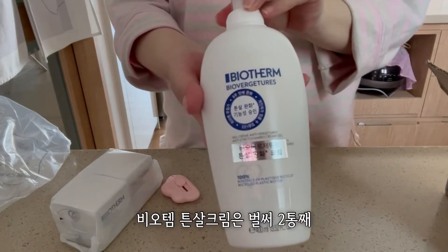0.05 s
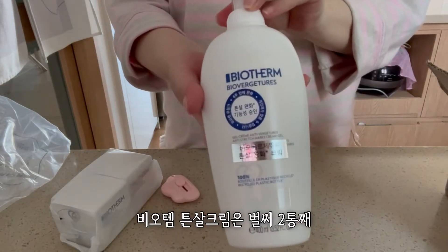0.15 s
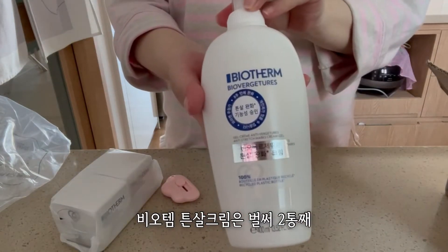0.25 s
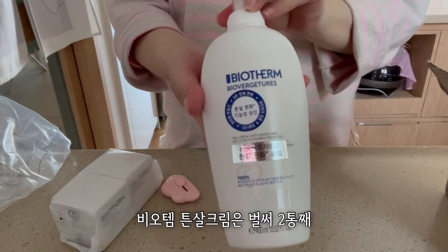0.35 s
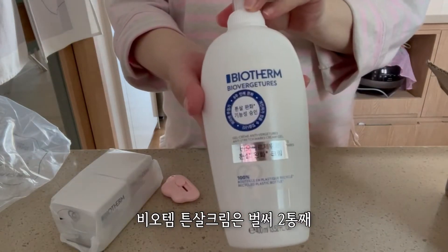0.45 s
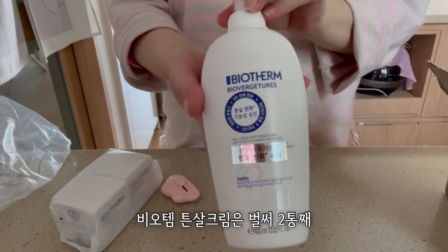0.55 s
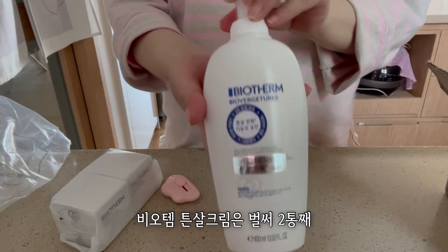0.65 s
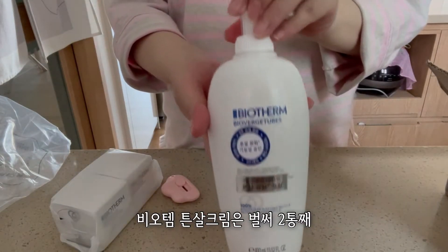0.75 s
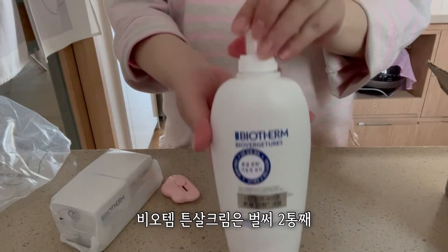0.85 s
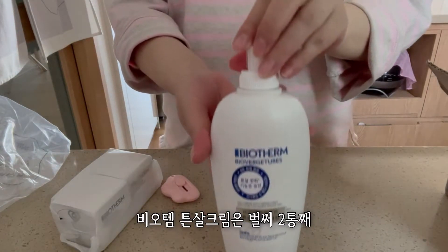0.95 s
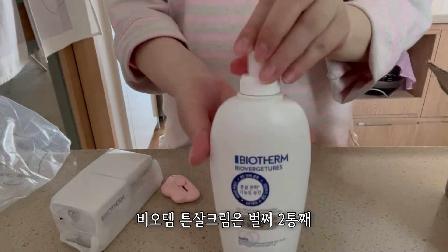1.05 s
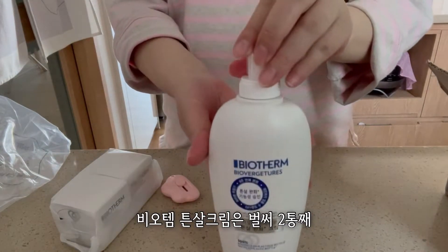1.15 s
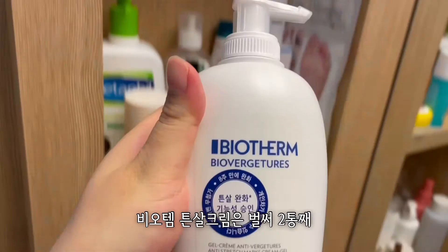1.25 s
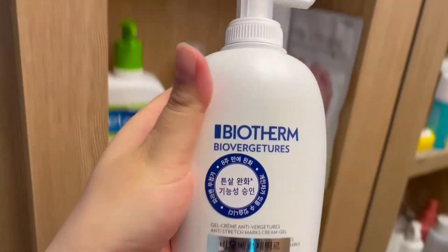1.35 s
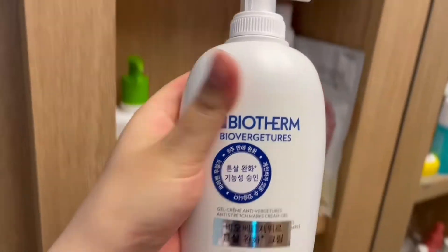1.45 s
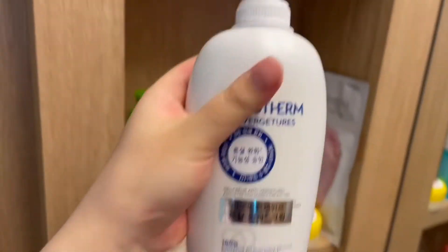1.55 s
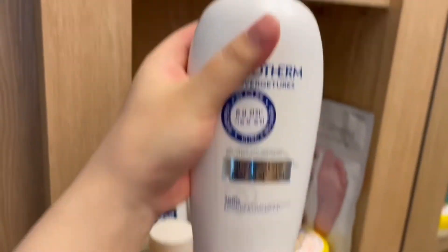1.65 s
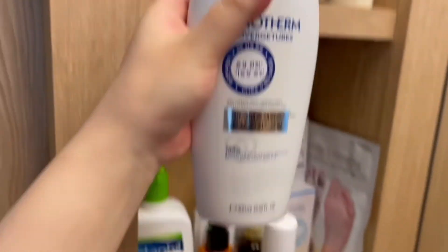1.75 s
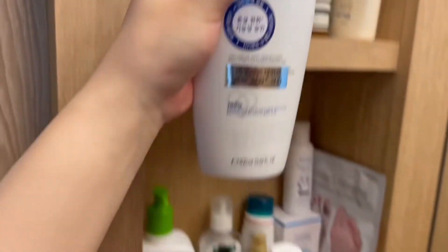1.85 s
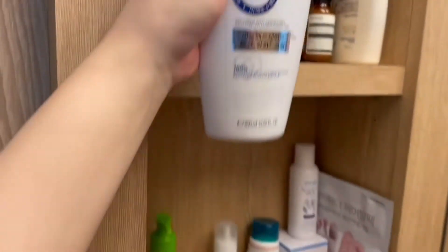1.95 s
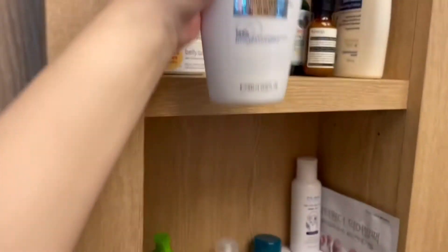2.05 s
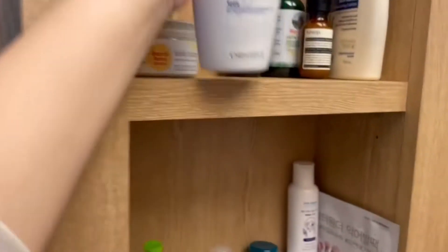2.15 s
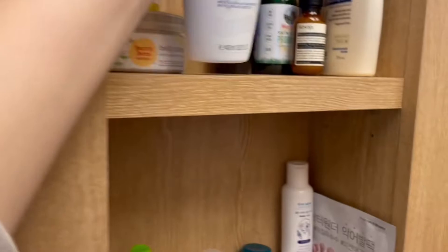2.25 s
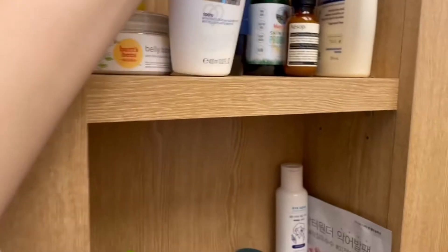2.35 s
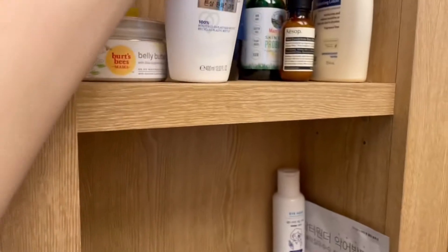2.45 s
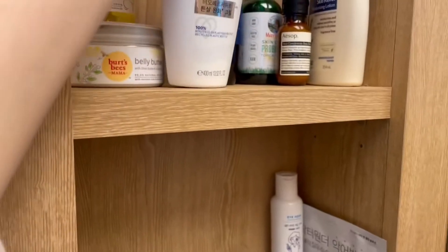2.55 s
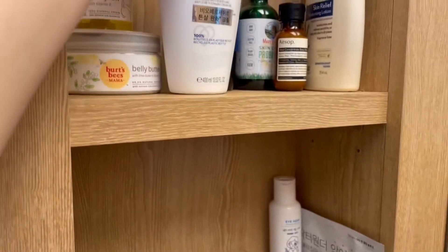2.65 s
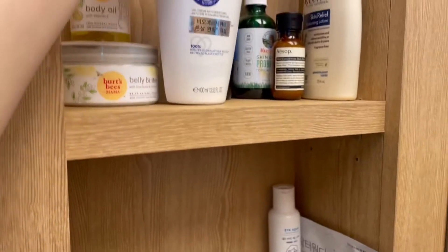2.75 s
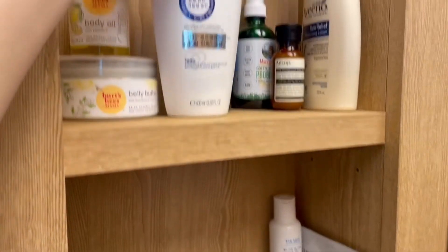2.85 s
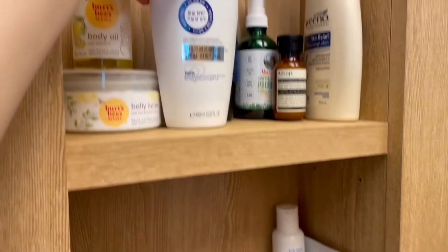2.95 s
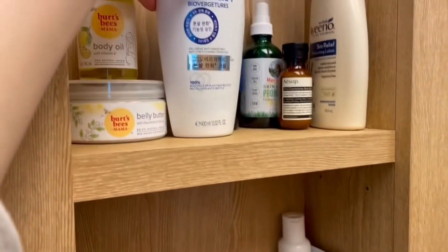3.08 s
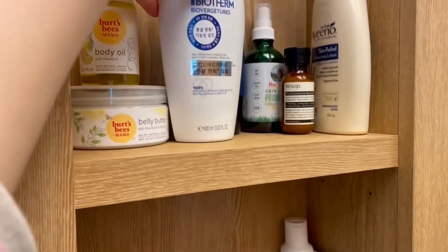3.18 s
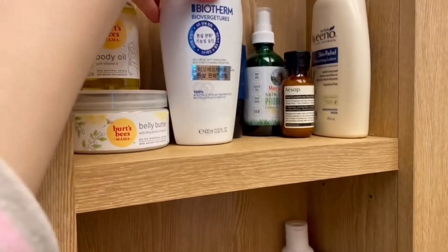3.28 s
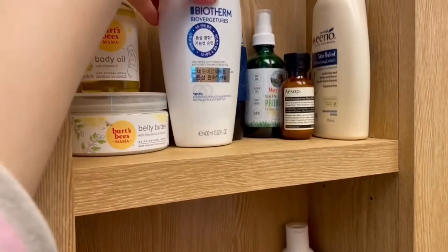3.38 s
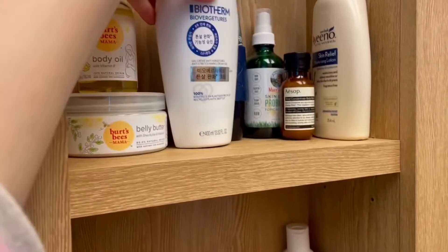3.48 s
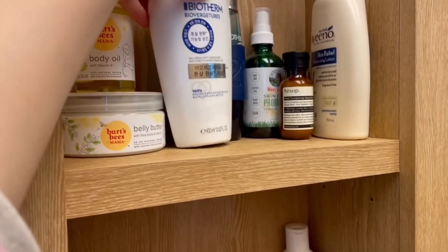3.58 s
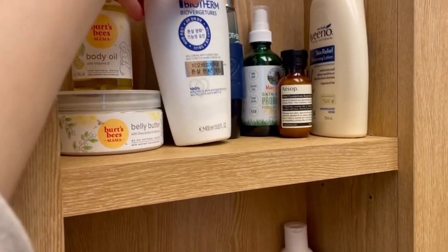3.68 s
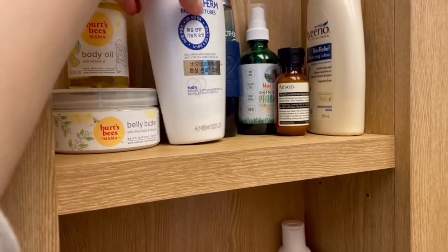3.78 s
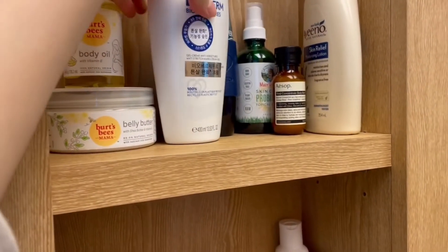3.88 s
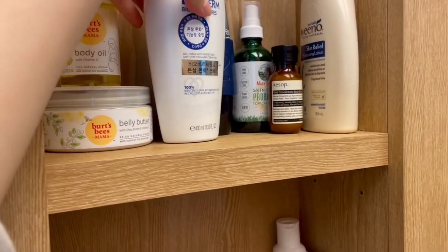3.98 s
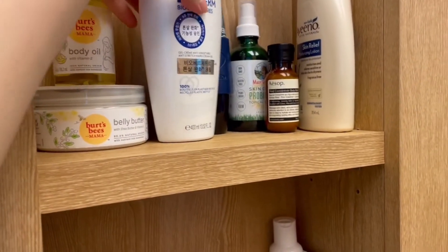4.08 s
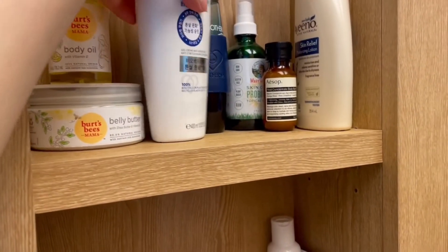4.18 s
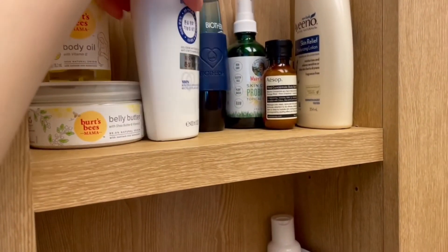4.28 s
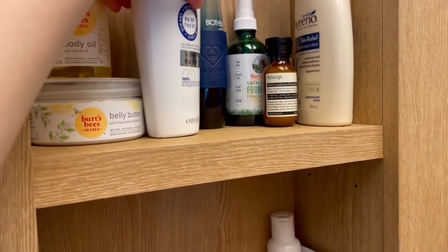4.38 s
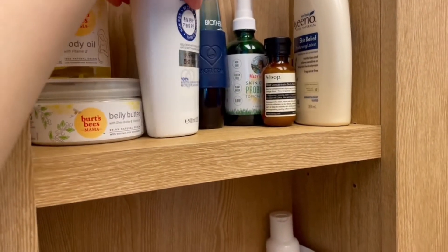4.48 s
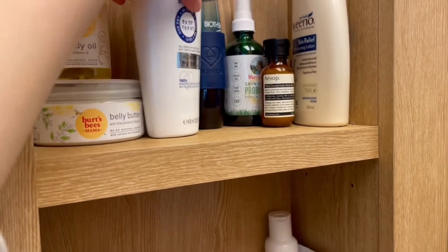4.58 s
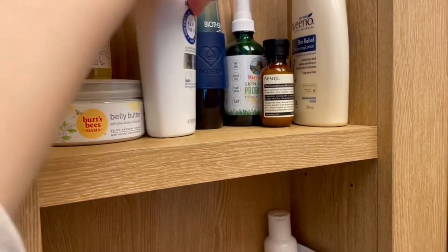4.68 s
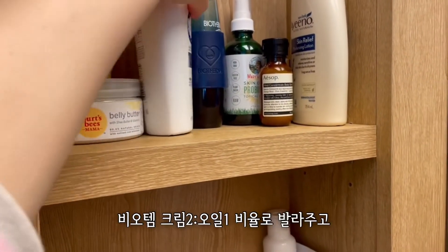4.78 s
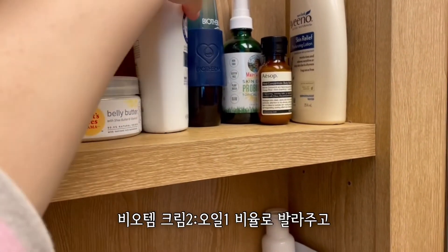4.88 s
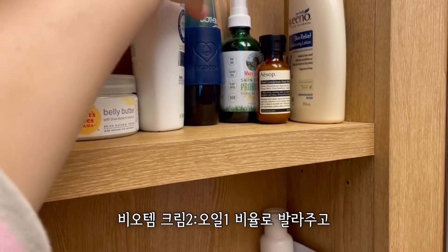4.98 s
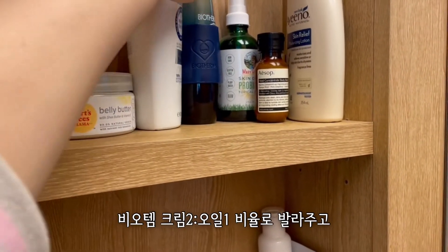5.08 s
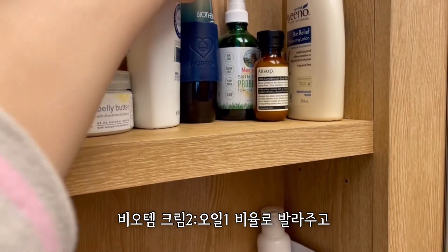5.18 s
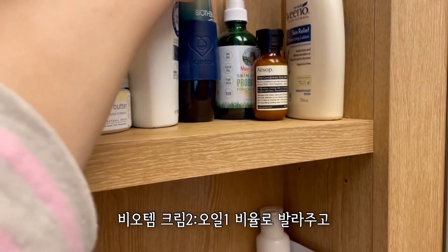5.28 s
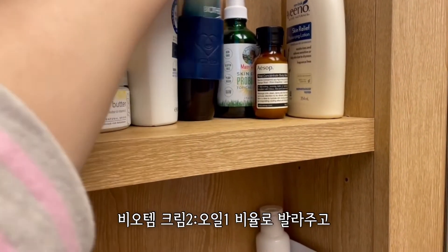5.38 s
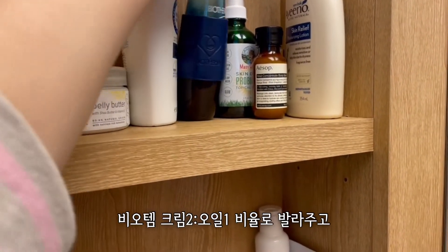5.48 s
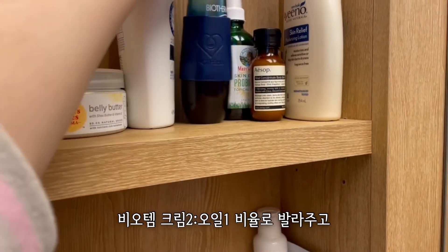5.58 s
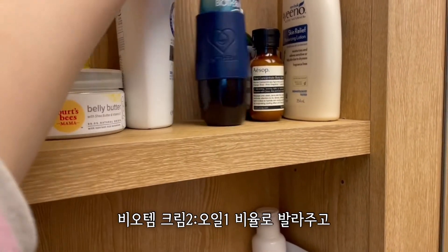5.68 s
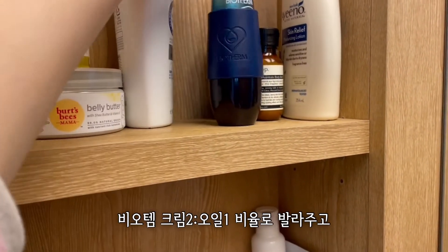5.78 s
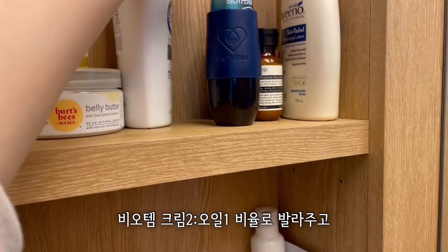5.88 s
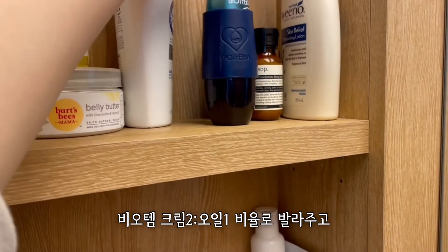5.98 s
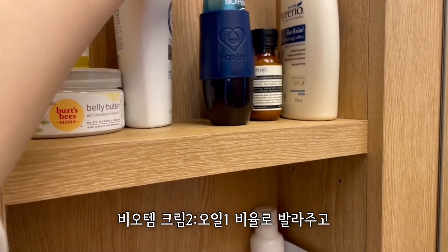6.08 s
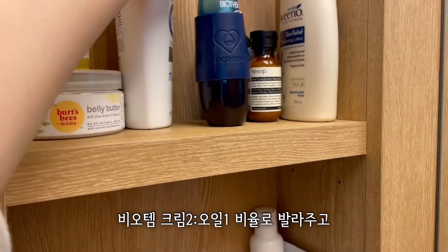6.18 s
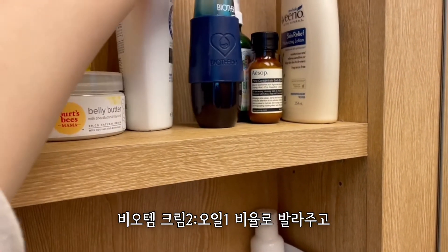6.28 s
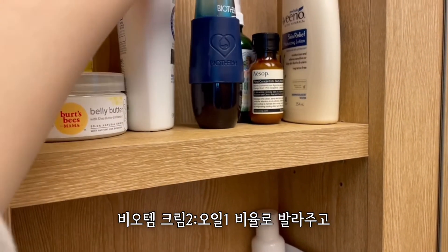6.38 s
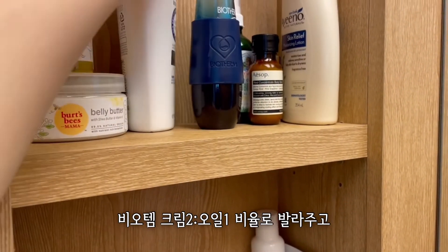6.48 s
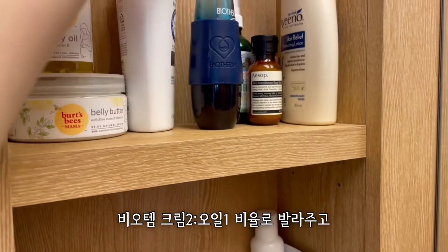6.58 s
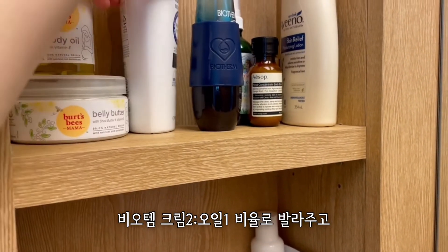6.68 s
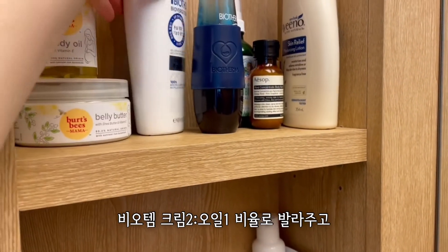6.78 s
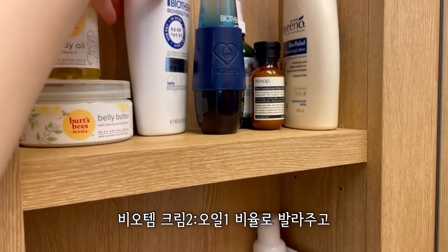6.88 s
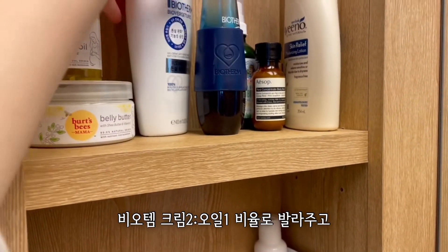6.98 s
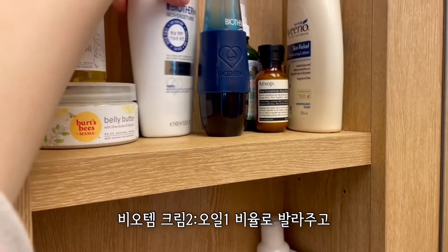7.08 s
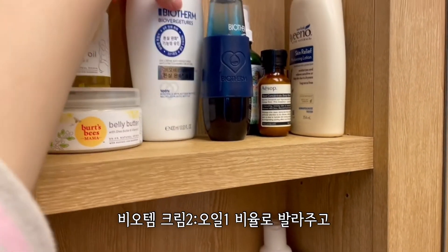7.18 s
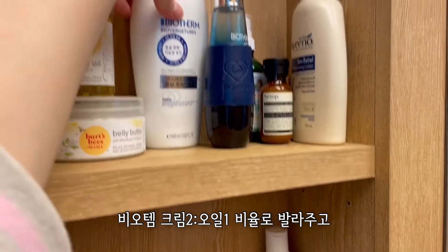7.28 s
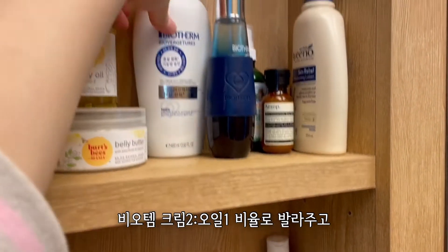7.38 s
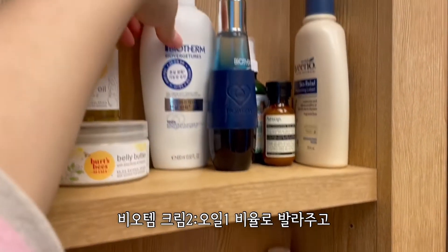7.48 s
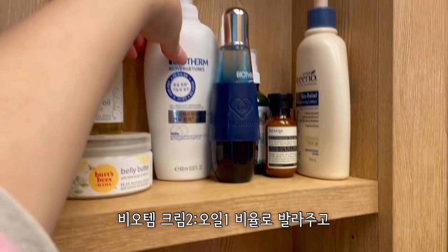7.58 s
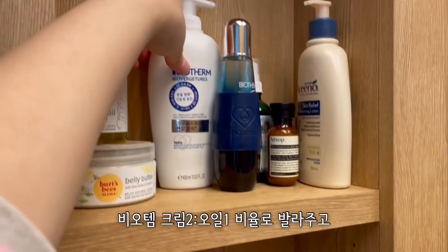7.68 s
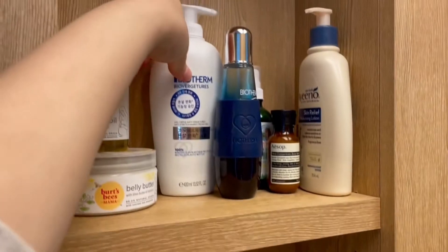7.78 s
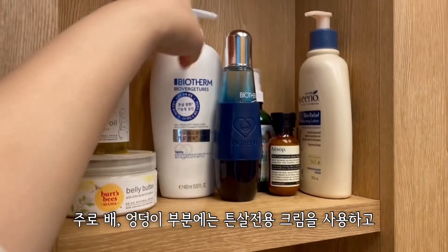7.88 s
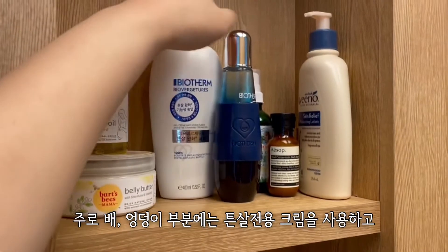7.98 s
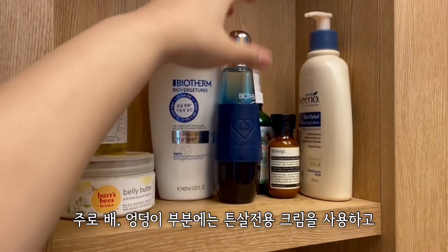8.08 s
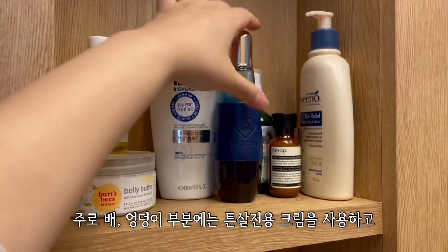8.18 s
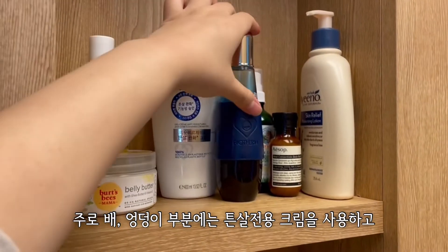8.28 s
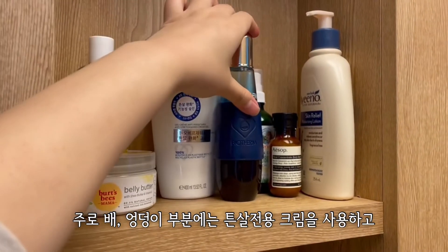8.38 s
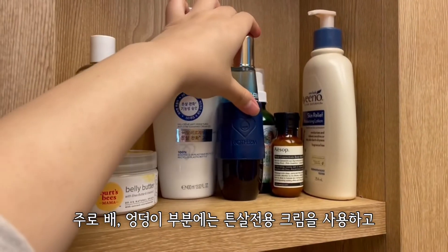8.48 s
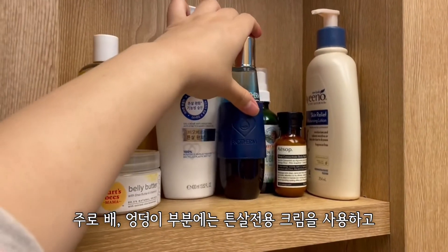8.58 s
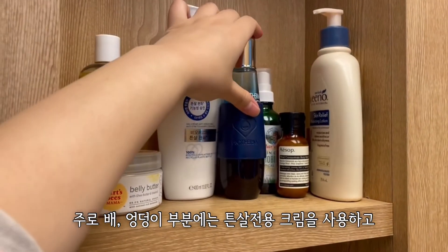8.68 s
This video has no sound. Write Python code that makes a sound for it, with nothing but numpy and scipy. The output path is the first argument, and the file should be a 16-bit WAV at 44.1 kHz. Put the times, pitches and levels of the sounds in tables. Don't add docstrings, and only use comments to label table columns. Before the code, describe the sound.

In a quiet humming kitchen, a full plastic bottle lands on a stone counter with a low thud and small crack. The place abruptly switches to a drier, quieter wooden closet, where bottles are set down, knocked and rocked on a shelf. A glass flask scrapes forward briefly, then another firm knock and light touches follow. Sleeve cloth rustles finely. Close stereo handheld microphone with faint low handling rumble.

```python
import sys
import numpy as np
from scipy import signal
from scipy.fft import rfft, irfft
from scipy.io import wavfile

SR = 44100
rng = np.random.default_rng(int(sys.argv[2]) if len(sys.argv) > 2 else 0)


def transcribe(signal):
    frames = np.atleast_2d(signal).T
    limited = np.clip(frames, -1, 1)
    pcm = np.round(limited * 32767).astype(np.int16)
    wavfile.write(sys.argv[1], SR, pcm)


def convert_level_to_amplitude(level_db):
    exponent = np.asarray(level_db, float) / 20
    return 10 ** exponent


N = 385434
CUT_S = 1.246
HZ = np.maximum(np.fft.rfftfreq(N, 1 / SR), 1)

# pitch_hz, level_db
BOARD = [
    [(155, 2.5), (190, 2.5), (230, 4.5), (290, -0.5), (350, -2.5), (445, -5)],
    [(560, -2), (630, 1), (705, 0.5), (765, 12), (850, 8), (945, 6), (1050, 3.5), (1200, -21.5)],
]
# pitch_hz, level_db_per_hz
BOTTLE = [(1000, -16), (1400, -6), (1800, 4.5), (2300, -1.5), (2700, 3), (3330, 2.5), (4000, -6.5),
          (5000, -1.5), (6500, -6), (8000, -23), (10000, -21)]
# pitch_hz, level_db
NEIGHBOUR = [(1550, -11), (1720, -3), (1900, -4), (2190, -9), (2400, -2.5), (2750, -1), (3050, -6.5),
             (3350, -4.5), (3700, -10.5), (4030, -18), (4900, -17)]
# pitch_hz, level_db_per_hz
RUSTLE = [(3000, -36), (6000, -16), (8500, -1), (13000, -2), (15000, -6), (16000, -16), (17000, -35)]
# pitch_hz, likeness
LIKENESS = [(60, 0.58), (180, 0.84), (550, 0.46), (1650, 0.36), (4970, 0.67), (15000, 0.88)]


def counter_blows():
    # start_s, strength_db, low_weight_db, crack_db, ring_t60_s
    landings = [
        (0.949, -44.5, 15.5, 0, 0.045),
        (0.975, -50, 16.5, -22, 0.069),
        (1.157, -63.5, 9, 3, 0.019),
    ]
    # pitch_hz, level_db
    slab = [
        [(145, 14), (253, 7.5), (340, 0.5), (440, -21)],
        [(533, -10), (620, 23), (930, 2.5), (1200, -6)],
    ]
    # pitch_hz, level_db_per_hz
    crack = [(1000, -5), (1480, 16), (1900, -16), (2600, -1), (3600, -8), (5800, -4), (7500, -1),
             (9500, -20)]
    return blows(landings, slab, crack, edge_db=-30)


def shelf_blows():
    # start_s, strength_db, low_weight_db, crack_db, ring_t60_s
    rims = [(2.313, -27, 0.5, -17.5, 0.036), (2.825, -52, 1, -32, 0.068), (3.224, -47, 2, -29, 0.1),
            (3.291, -38, -6, -24, 0.014), (3.479, -78, -5, -16, 0.061), (3.523, -67.5, 12.5, -25, 0.2),
            (3.616, -57, -5, -19, 0.086), (4.088, -66.5, 13.5, -20, 0.088), (4.907, -51, -23, -13, 0.017),
            (5.166, -35.5, 7.5, -5, 0.086), (6.077, -72, 8, -31, 0.069), (6.608, -56.5, 0, 8.5, 0.025),
            (7.353, -27.5, 6, -15, 0.016), (8.487, -51.5, 0.5, -19.5, 0.31), (8.563, -49.5, 9, -28, 0.053)]
    # start_s, strength_db, low_weight_db, crack_db, ring_t60_s
    flats = [
        (2.364, -43.5, 8, -13, 0.049),
        (2.92, -57.5, -4, -3, 0.028),
        (3.803, -40.5, -1.5, -22.5, 0.036),
        (4.228, -56.5, 7, -2.5, 0.081),
        (6.155, -51, 0, -39, 0.13),
        (7.062, -57, 3.5, -14, 0.12),
        (7.147, -52, -3, -29, 0.084),
        (8.3, -53.5, 5, -17, 0.15),
    ]
    # start_s, strength_db, low_weight_db, crack_db, ring_t60_s
    rocks = [
        (2.385, -51, 9, -11, 0.039),
        (3.278, -51, 9.5, -19, 0.064),
        (6.405, -80, 11, -5, 0.024),
        (6.735, -69, 2, 1, 0.052),
        (3.47, -67, -1, -6.5, 0.046),
        (7.086, -53.5, -15, -15.5, 0.087),
        (7.168, -59, 8, -19, 0.13),
        (8.473, -58, -3, -12, 0.026),
        (8.6, -61, -2, -22, 0.056),
    ]
    return sum(blows(table, BOARD, BOTTLE, edge_db) for table, edge_db in ((rims, -4.5), (flats, -36), (rocks, -36)))


def blows(table, body, shell, edge_db):
    out, t = np.zeros(N), np.arange(16384) / SR
    for s, strength_db, weight_db, hard_db, t60 in table:
        levels_db = strength_db + np.array([weight_db, 0, hard_db, hard_db + edge_db])
        t60 = np.clip(t60, .02, .6)
        noise = rng.standard_normal((4, len(t)))
        low_push = soft(noise[0], hz=645) * t * np.exp(-t / 0.0035) + 1e-18
        upper_push = soft(noise[1], hz=1420) * np.exp(-t / 0.0075) + 1e-18
        parts = [ring(low_push, body[0], t60, spread_db=3.5),
                 ring(upper_push, body[1], 0.87 * t60, spread_db=-5.5),
                 shaped(noise[2], shell) * (np.exp(-t / 0.011) + 3.2 * convert_level_to_amplitude(-60 * t / t60)),
                 shaped(noise[3], RUSTLE) * (np.exp(-t / 0.0046) + 0.36 * np.exp(-t / 0.017))]
        for db, part in zip(levels_db, parts):
            add(out, s, convert_level_to_amplitude(db + 9.5) * part / np.abs(part).max())
    return out


def furniture_swing():
    # start_s, peak_db, pitch_hz, swell_s, t60_s
    swings = [(0.956, -9, 76.4, 0.011, 0.098), (1.172, -32.5, 72.7, 0.031, 0.092),
              (2.333, -28, 63.6, 0.011, 0.55), (2.399, -27, 60.8, 0.0045, 0.15),
              (2.929, -35, 70.5, 0.0083, 0.034), (3.237, -19, 66.3, 0.01, 0.33),
              (3.329, -26, 58, 0.029, 0.16), (3.808, -40.5, 66.3, 0.043, 0.74), (4.24, -48, 74, 0.027, 0.3),
              (4.937, -35, 56.5, 0.0081, 0.15), (5.173, -25, 70.8, 0.0065, 0.26),
              (7.16, -35, 51, 0.0031, 0.1), (7.36, -11, 70, 0.039, 0.064),
              (7.353, -17, 142.4, 0.0025, 0.16), (7.437, -23, 67.6, 0.0068, 0.2),
              (8.333, -34.5, 65.3, 0.011, 0.34), (8.564, -29.5, 79, 0.02, 0.14),
              (8.65, -34.5, 73.5, 0.012, 0.14)]
    swing = thumps(swings, sag_s=.005)
    later = np.roll(swing, round(0.0029 * SR)) * (np.arange(N) / SR < CUT_S)
    return swing + convert_level_to_amplitude(-13) * later * [[1], [-1]]


def panel_notes():
    # start_s, peak_db, pitch_hz, swell_s, t60_s
    heavy = [(0.9531, -40, 291, 0.0037, .14), (2.3141, -28.5, 294, 0.0028, 0.058),
             (2.3142, -27.5, 162, 0.0045, .075), (2.3161, -37, 1027, 0.0033, 0.12),
             (2.3351, -31.5, 112, .0081, 0.14), (2.3621, -37, 166, 0.0042, .075),
             (2.3671, -42, 1010, .0031, 0.17), (2.4031, -34.5, 117, 0.0071, 0.1),
             (3.2221, -48.5, 720, .0031, 0.086), (3.2321, -35.5, 197, 0.004, 0.064),
             (3.2331, -37.5, 308, 0.0055, 0.1), (3.2931, -32.5, 334, 0.0025, 0.068),
             (3.2941, -37, 444, 0.0037, .13), (3.3521, -60.5, 440, 0.0086, 0.069),
             (3.8051, -37, 191, 0.0051, .12), (3.8052, -46.5, 294, 0.0084, 0.12),
             (3.8053, -41.5, 630, .0031, 0.083), (3.8054, -58.5, 2750, .002, 0.097),
             (5.1671, -26, 170, 0.0033, 0.074), (5.1691, -28.5, 452, 0.0028, 0.1),
             (5.1692, -32.5, 714, 0.0026, 0.15), (5.1672, -50.5, 2317, .0021, .085),
             (5.2051, -39.5, 444.6, 0.02, .11), (7.3551, -30, 289, 0.004, 0.12),
             (7.3552, -27.5, 224, .0051, 0.16), (7.3553, -31, 465, 0.0028, .11),
             (7.3554, -28.5, 625, .0035, 0.046), (7.3751, -37, 452, .0121, 0.24)]
    # start_s, peak_db, pitch_hz, swell_s, t60_s
    light = [(2.8293, -52, 330, .005, 0.11), (2.9214, -39.5, 301, .0045, 0.05),
             (3.5219, -55, 445, .006, .12), (3.6137, -47, 214.5, .008, .1), (3.6551, -55, 435, .008, .12),
             (4.2346, -45.5, 215, .008, .1), (4.7651, -49, 217, .0061, 0.083),
             (4.8101, -54, 735, .0121, 0.14), (6.0781, -58, 720, .004, .085), (6.0818, -56, 363, .006, .09),
             (6.3951, -61.5, 740, .008, .11), (6.4007, -49.5, 337, .013, .1),
             (6.6091, -46, 796, .0021, 0.07), (6.6092, -54, 1150, .0021, .075),
             (6.61, -63, 1730, .0021, 0.073), (6.6106, -42.5, 326, .0081, 0.075),
             (8.3001, -45, 770, .0041, 0.096), (8.4901, -49, 777, .0121, 0.15),
             (8.5651, -44, 445, .0051, 0.21), (8.6517, -44, 252, .0081, 0.066)]
    return thumps(heavy, sag_s=.0008) + thumps(light, sag_s=.0008)


def thumps(table, sag_s):
    out, t = np.zeros(N), np.arange(SR // 2) / SR
    for s, db, hz, swell, t60 in table:
        shape = (1 - np.exp(-(t / max(swell, .003)) ** 2)) * convert_level_to_amplitude(-60 * t / np.clip(t60, .04, .6))
        phase = 2 * np.pi * hz * (t + sag_s * (1 - np.exp(-t / .012)))
        add(out, s, convert_level_to_amplitude(db) * shape / shape.max() * np.sin(phase))
    return out


def drags():
    clumps = convert_level_to_amplitude(1.5 * drift(45))
    slips = grains(4000, size_db=2.5) * clumps * catches()
    hiss = coloured(grains(8400, size_db=3.0) * clumps, RUSTLE)
    walls = rms_one(ring(slips, NEIGHBOUR, 0.12))
    return turned_bases(slips, hiss, walls) + pulled_flask(slips, hiss) + rubs() * walls


def turned_bases(slips, hiss, walls):
    low_gain, upper_gain, scratch_gain, hiss_gain = turns()
    low = rms_one(ring(soft(slips, hz=607), BOARD[0], 0.079))
    upper = rms_one(ring(soft(slips, hz=1340), BOARD[1], 0.052))
    scratch = coloured(slips, BOTTLE) + 0.06 * walls
    return low_gain * low + upper_gain * upper + scratch_gain * scratch + hiss_gain * hiss


def turns():
    # start_s, length_s, strength_db, low_weight_db, scratch_db
    turn_events = [(1.91, 0.47, -81.5, 10, 8), (2.443, 0.39, -86, 14, 7), (2.8, 0.11, -71, 14, -2),
                   (2.901, 0.047, -62.5, 12.5, -6), (2.945, 0.18, -75.5, 12, -4),
                   (3.124, 0.27, -61, 4, -11.5), (3.269, 0.021, -53, 3, -32), (3.464, 0.057, -67.5, 6, -16),
                   (3.512, 0.038, -77, 27.5, -20.1), (3.588, 0.13, -69.5, 16, -16),
                   (3.809, 0.031, -47.5, -4, -25), (3.888, 0.075, -70, 17, -31),
                   (4.06, 0.31, -60.5, 9, -23), (4.227, 0.052, -53.5, 12, -35), (4.56, 0.24, -62.5, 5, -15),
                   (4.741, 0.27, -55.5, -0.5, -10.5), (4.862, 0.18, -63.5, 8.5, -22),
                   (6.388, 0.059, -76.5, 20.5, 3.5), (6.691, 0.16, -56, 4, -23.5),
                   (7.04, 0.24, -60.5, 6.5, -20), (7.245, 0.096, -73.5, 15, 0), (2.295, 0.055, -54, 4, -10),
                   (5.141, 0.095, -59, -10, -16.5), (7.295, 0.074, -43, -9, -18.5),
                   (8.269, 0.16, -58, 11, -30), (8.377, 0.3, -57.5, 3, -34), (8.566, .17, -54, 9.5, -13)]
    push_share, skin_db = 0.28, -7.5
    out = np.zeros((4, N))
    for s, length, db, weight_db, scratch_db in turn_events:
        length = max(length, .02)
        u = np.arange(int(length * SR)) / (length * SR)
        speed = np.sin(np.pi / 2 * np.minimum(u / push_share, (1 - u) / (1 - push_share))) ** 2
        for layer, more_db in zip(out, (weight_db, 0, scratch_db, scratch_db + skin_db)):
            add(layer, s, convert_level_to_amplitude(db + more_db) * speed)
    return out


def pulled_flask(slips, hiss):
    # pitch_hz, level_db
    flask = [(1710, 4.5), (1830, 5.5), (2220, -7.5), (2600, 2), (2800, -6), (2970, -11), (3335, 3.5),
             (3710, -27), (4010, -21), (4940, -17), (5640, -29), (6230, -26), (7290, -33.5)]
    # pitch_hz, level_db
    first_board = [(600, -16), (703, 0), (740, -3), (845, -4.5), (945, -4), (1050, -5), (1150, -20.5)]
    # pitch_hz, level_db
    second_board = [(170, 0), (358, 2.5), (575, -7.5), (731, 5), (840, -5.5), (1027, -5), (1170, -35),
                    (250, -4)]
    first, second = pulls()
    low_gain, _, glass_gain, hiss_gain = first + second
    under = rms_one(ring(soft(slips, hz=656), BOARD[0][1:], 0.13))
    foot = rms_one(ring(soft(slips, hz=950), first_board, 0.071))
    rest = convert_level_to_amplitude(2.0) * rms_one(ring(soft(slips, hz=1300), second_board, 0.082))
    modes = [(hz, db - 20 * np.log10(hz)) for hz, db in flask]
    glass = rms_one(ring(np.diff(slips, prepend=0), modes, .08))
    glass = glass + .3 * coloured(slips, BOTTLE)
    return low_gain * under + first[1] * foot + second[1] * rest + glass_gain * glass + hiss_gain * hiss


def pulls():
    # time_s, speed_db
    speeds = [
        [(5.44, -88), (5.46, -66), (5.5, -50), (5.56, -37), (5.65, -32), (5.72, -38.5), (5.77, -56),
         (5.83, -73.5)],
        [(6.07, -102), (6.082, -77), (6.12, -83), (6.156, -50), (6.285, -51), (6.31, -84.5), (6.37, -91)],
    ]
    # full_speed_db, slope_db_per_db
    layers = [
        (-39.5, 0.5),
        (-29, 1),
        (-52, 1.36),
    ]
    layers = [*layers, (-69, 2.3)]
    full_speed_db = -31
    return np.array([[gains([(s, top_db + slope * (db - full_speed_db)) for s, db in rows])
                      for top_db, slope in layers] for rows in speeds])


def catches():
    # time_s, surge_db
    surges = [(5.471, -1), (5.499, -0.5), (5.508, 6), (5.534, 9), (5.549, 1), (5.565, 15.5), (5.575, 0),
              (5.607, 13.5), (5.638, 9), (5.651, 6.5), (5.69, 4), (5.722, 6.5), (6.157, 3.5), (6.19, 11.5),
              (6.212, 3), (6.231, 3), (6.26, 8), (6.272, 7), (6.282, 12)]
    t = np.arange(N) / SR
    return convert_level_to_amplitude(sum(db * (t > s) * np.exp(-np.abs(t - s) / .006) for s, db in surges))


def rubs():
    # start_s, length_s, level_db
    strokes = [
        (3.145, 0.069, -78.5),
        (3.457, 0.063, -75.5),
        (4.073, 0.095, -79),
        (4.174, 0.066, -71),
        (4.775, 0.13, -96),
        (5.49, 0.048, -73),
        (6.15, 0.13, -76.5),
        (6.71, 0.074, -70.5),
        (8.58, 0.12, -74.5),
    ]
    gain = np.zeros(N)
    for s, length, db in strokes:
        add(gain, s, convert_level_to_amplitude(db) * np.hanning(int(max(length, .02) * SR)) ** .5)
    return gain


def clinks():
    # start_s, peak_db, t60_s
    touches = [
        (2.314, -34.5, 0.049),
        (2.917, -64, 0.055),
        (3.228, -50.5, 0.041),
        (3.293, -53.5, 0.034),
        (3.804, -43, 0.037),
        (4.228, -64, 0.11),
        (4.906, -52, 0.027),
        (5.168, -41, 0.062),
        (6.608, -60, 0.065),
        (7.353, -42, 0.047),
    ]
    out, t = np.zeros(N), np.arange(8192) / SR
    for s, db, t60 in touches:
        touch = rng.standard_normal(len(t)) * np.exp(-t / 0.002) + 1e-18
        walls = ring(touch, NEIGHBOUR, np.clip(t60, .03, .4) * 2, spread_db=5.5)
        add(out, s, convert_level_to_amplitude(db) * walls / np.abs(walls).max())
    return out


def sleeve():
    # time_s, level_db
    movement = [(1.25, -99), (1.5, -79), (2.02, -77), (2.38, -81), (2.79, -79), (3.42, -89), (3.73, -87),
                (3.92, -96), (4.55, -97), (4.77, -89), (5.59, -89), (5.82, -98), (6.15, -98), (6.5, -91),
                (7.32, -84), (7.97, -95), (8.45, -97), (8.74, -91)]
    flutter = convert_level_to_amplitude(2.2 * drift(14))
    return gains(movement) * convert_level_to_amplitude(1.5) * coloured(grains(5100, size_db=1.5) * flutter, RUSTLE)


def cuff():
    # start_s, peak_db
    snaps = [(1.939, -53.5), (1.973, -59), (2.0652, -55), (2.5506, -57.5), (2.9138, -72), (3.0338, -57),
             (3.5468, -66), (3.6182, -75), (3.7249, -64), (3.744, -62), (3.912, -74), (4.131, -69),
             (4.2273, -68), (4.7087, -67), (4.9057, -56), (5.3388, -68), (5.3597, -72), (5.6386, -58),
             (5.8344, -70), (6.371, -76), (6.413, -54), (6.847, -69), (6.9601, -71), (7.1666, -76),
             (8.0272, -75), (8.473, -60)]
    # start_s, length_s, level_db
    brushes = [(2.094, 0.31, -70), (2.734, 0.16, -72), (3.634, 0.1, -74), (3.785, 0.11, -76.5),
               (3.91, 0.045, -83), (5.17, 0.12, -65), (5.275, 0.075, -81), (6.362, 0.16, -76),
               (6.428, 0.13, -92), (6.82, 0.057, -89), (7.063, .12, -80), (7.301, 0.13, -59.5)]
    # pitch_hz, level_db_per_hz
    cloth = [(3000, -30), (6000, -12.5), (8500, -20), (11000, -13), (13500, -9.5), (15000, -15),
             (16500, -30)]
    gain, t = np.zeros(N), np.arange(1024) / SR
    for s, db in snaps:
        add(gain, s, convert_level_to_amplitude(db - 5.0) * np.exp(-t / 0.0042))
    for s, length, db in brushes:
        u = np.linspace(0, 1, int(max(length, .02) * SR))
        add(gain, s, convert_level_to_amplitude(db) * np.sin(np.pi * u ** 0.41) ** 2)
    return gain * coloured(rng.standard_normal(N), cloth)


def ticks():
    # start_s, peak_db, centre_hz
    finger_snaps = [
        (0.0318, -67, 8950),
        (0.806, -64, 3000),
        (0.978, -67, 5960),
        (2.0637, -63, 3170),
        (2.1388, -59, 2650),
        (3.7443, -65.5, 2640),
        (6.2, -75, 6500),
        (7.998, -70, 5620),
        (8.4717, -70, 2750),
    ]
    out, t = np.zeros(N), np.arange(2048) / SR
    for s, db, hz in finger_snaps:
        band = signal.butter(2, [hz / 3.0, min(hz * 1.7, .45 * SR)], "band", fs=SR, output="sos")
        snap = signal.sosfilt(band, rng.standard_normal(len(t))) * np.exp(-t / 0.048)
        add(out, s, convert_level_to_amplitude(db) * snap / np.abs(snap).max())
    return out


def sway():
    # time_s, level_db
    unrest = [(0.0, -60.5), (0.61, -60), (0.97, -56.5), (1.07, -43.5), (1.22, -55), (1.46, -60),
              (3.82, -53), (4.67, -57), (5.06, -53.5), (6.08, -60), (6.23, -52.5), (7.01, -58.5),
              (7.35, -50.5), (7.94, -59), (8.15, -58.5), (8.74, -50)]
    # pitch_hz, level_db_per_hz
    rumble = [(25, -34), (40, 8.5), (60, 8.5), (90, 5.5), (125, -4), (170, -37), (300, -52), (1000, -120)]
    mid, side = (coloured(rng.standard_normal(N), rumble) for _ in range(2))
    lumps = convert_level_to_amplitude(1.0 + 2.0 * drift(14))
    return gains(unrest) * lumps * pair(mid, side, 0.99)


def kitchen(counter):
    # pitch_hz, level_db_per_hz
    hum = [(59, -27), (100, -1), (202, -21.5), (343, -15), (424, -29), (524, -24), (676, -34), (970, -32),
           (1480, -43), (2930, -53.5), (16000, -70.5)]
    direct = counter * convert_level_to_amplitude([[-3.5], [3.5]])
    return direct + convert_level_to_amplitude(-7.5) * echoes(counter, LIKENESS) + convert_level_to_amplitude(-57.5) * air(hum, LIKENESS)


def closet(shelf):
    # pitch_hz, level_db_per_hz
    hum = [(100, -6), (160, 0), (400, -2), (630, -9), (1000, -14), (2000, -25), (4000, -35), (6500, -36),
           (8500, -48), (13000, -47), (16000, -56)]
    # pitch_hz, likeness
    echo_likeness = [(60, .9), (200, .6), (600, .2), (2000, .3), (6000, .7), (15000, .9)]
    sounds = shelf + niche(shelf) + convert_level_to_amplitude(-11) * echoes(shelf, echo_likeness)
    return ports(sounds) + convert_level_to_amplitude(-66) * air(hum, LIKENESS)


def niche(x):
    t = np.arange(4096) / SR
    band = signal.butter(1, [250, 3500], "band", fs=SR, output="sos")
    walls = signal.sosfilt(band, rng.standard_normal((2, len(t))))
    walls = walls * convert_level_to_amplitude(-60 * t / 0.054) * np.minimum(t / 0.00061, 1)
    walls = walls / np.sqrt(np.sum(walls ** 2) / 8)
    return convert_level_to_amplitude(-13) * signal.fftconvolve(x[None], walls, axes=1)[:, :N] / 2


def echoes(x, likeness):
    # pitch_hz, t60_s
    decay = [(100, 0.36), (500, 0.26), (2000, 0.31), (8000, 0.1)]
    t, tail = np.arange(SR // 2) / SR, 0
    for low in 80 * 2. ** np.arange(7):
        octave = signal.butter(2, [low, 2 * low], "band", fs=SR, output="sos")
        mid, side = signal.sosfilt(octave, rng.standard_normal((2, len(t))))
        fall = convert_level_to_amplitude(-60 * t / at_hz(decay, 1.03 * low)) * np.minimum(t / 0.0071, 1)
        tail = tail + pair(mid, side, at_hz(likeness, 0.11 * low)) * fall
    return signal.fftconvolve(x[None], tail / np.sqrt(np.sum(tail ** 2) / 2), axes=1)[:, :N]


def air(spectrum, likeness):
    mid, side = rfft(rng.standard_normal((2, N))) * convert_level_to_amplitude(at_hz(spectrum, HZ)) * (HZ > 110)
    return rms_one(irfft(pair(mid, side, at_hz(likeness, HZ)), N)) * convert_level_to_amplitude(0.16 * drift(15.0))


def ports(x):
    # pitch_hz, lead_radians
    port_lead = [(0, 0), (700, 1.3), (1030, 1.4), (1900, -.5), (3200, 2.2), (4350, .2), (5500, 3.0),
                 (6700, 5.8), (7800, 4.1), (8600, 3.1), (9500, 2.3), (11800, 1.3), (13200, .1), (22050, 0)]
    # pitch_hz, level_db
    port_balance = [(60, -2), (110, -1.5), (200, 1), (380, -1), (700, 4), (1290, 4), (2380, 2.5),
                    (4400, 1.5), (8120, 3.5), (15000, -3)]
    hz, lead = np.transpose(port_lead)
    half = convert_level_to_amplitude(at_hz(port_balance, HZ) / 2) * np.exp(.5j * np.interp(HZ, hz, lead))
    return irfft(rfft(x) * np.array([half, 1 / half]), N)


def ring(force, modes, t60, spread_db=0):
    out = 0
    for (hz, db), luck in zip(modes, rng.standard_normal(len(modes))):
        r = convert_level_to_amplitude(-60 / (t60 * (500 / hz) ** .4 * SR))
        w = 2 * np.pi * hz / SR
        mode = signal.lfilter([0, np.sin(w)], [1, -2 * r * np.cos(w), r * r], force)
        out = out + convert_level_to_amplitude(db + spread_db * luck) * mode
    return out


def grains(per_s, size_db):
    sizes = convert_level_to_amplitude(size_db * np.minimum(rng.exponential(1, N), 5)) * rng.choice([-1, 1], N)
    return sizes * (rng.random(N) < per_s / SR) + 1e-18


def soft(x, hz):
    return signal.sosfilt(signal.butter(4, hz, fs=SR, output="sos"), x)


def shaped(x, spectrum):
    hz = np.maximum(np.fft.rfftfreq(len(x), 1 / SR), 1)
    return irfft(rfft(x) * convert_level_to_amplitude(at_hz(spectrum, hz)), len(x))


def coloured(x, spectrum):
    return rms_one(shaped(x, spectrum))


def rms_one(x):
    return x / np.sqrt(np.mean(x ** 2) + 1e-20)


def at_hz(points, hz):
    table_hz, values = np.transpose(points)
    return np.interp(np.log(hz), np.log(table_hz), values)


def gains(rows):
    s, db = np.transpose(rows)
    return convert_level_to_amplitude(np.interp(np.arange(N) / SR, s, db)) * fades(s)


def fades(s):
    t = np.arange(N) / SR
    return np.clip(np.minimum(t - s[0], s[-1] - t) / .03 + 1, 0, 1) ** 2


def drift(rate):
    knots = rng.standard_normal(int(N / SR * 60) + 2)
    return np.interp(np.arange(N) / SR * min(rate, 59), np.arange(len(knots)), knots)


def pair(mid, side, alike):
    alike = np.clip(alike, -1, 1)
    return np.sqrt(1 + alike) * mid + np.sqrt(1 - alike) * side * [[1], [-1]]


def add(out, s, x):
    at = round(s * SR)
    out[at:at + len(x)] += x[:N - at]


def scene():
    t = np.arange(N) / SR
    notes = panel_notes()
    counter = counter_blows() + notes * (t < CUT_S)
    shelf = shelf_blows() + drags() + clinks() + notes * (t > CUT_S)
    cloth = sleeve() + cuff() + ticks()
    low = furniture_swing() + sway()
    whole = np.where(t < CUT_S, kitchen(counter), closet(shelf)) + ports(cloth) + low
    return whole * np.clip(np.abs(t - CUT_S) / .003 - 1, .03, 1) ** 2


def low_pass(x):
    return signal.sosfilt(signal.butter(12, 16520, fs=SR, output="sos"), x)


def record(dry):
    bass_cut = signal.butter(2, 37, "high", fs=SR, output="sos")
    top_cut = signal.cheby2(10, 40, 16100, fs=SR, output="sos")
    mix = signal.sosfilt(top_cut, signal.sosfilt(bass_cut, dry))
    return low_pass(mix)


dry = scene()
out = record(dry)
transcribe(out)
```